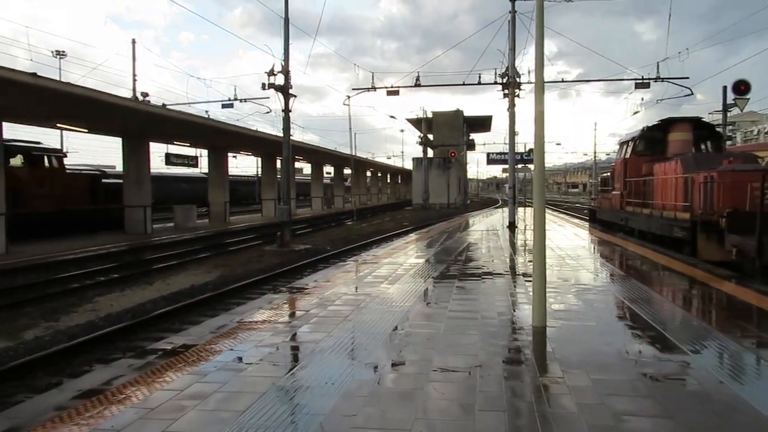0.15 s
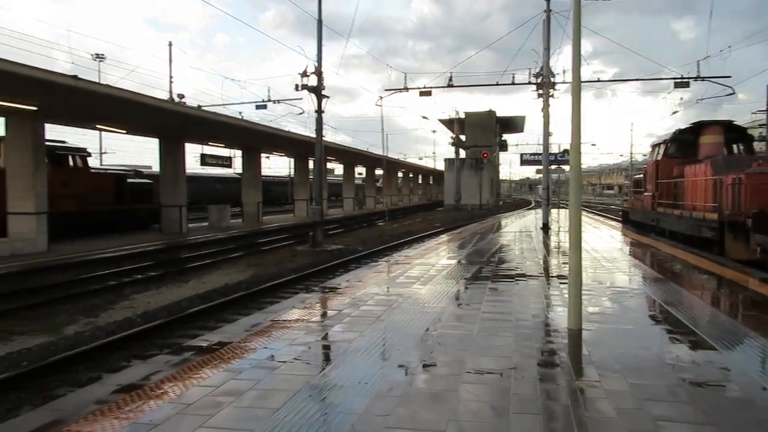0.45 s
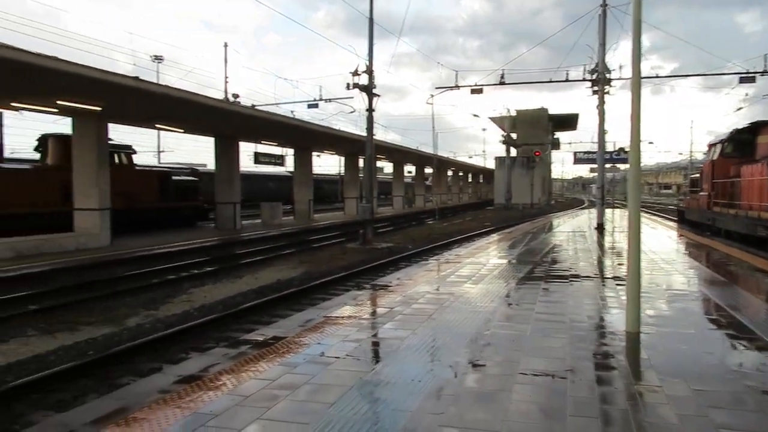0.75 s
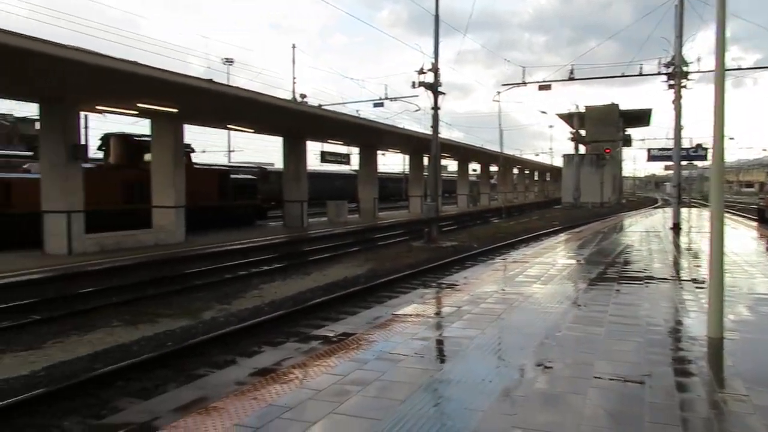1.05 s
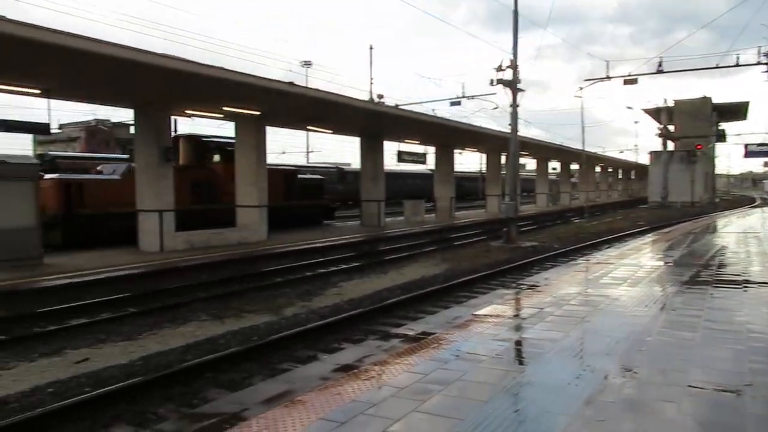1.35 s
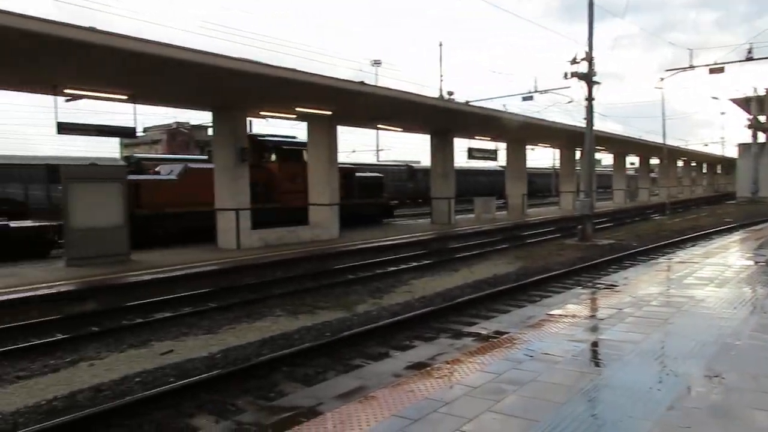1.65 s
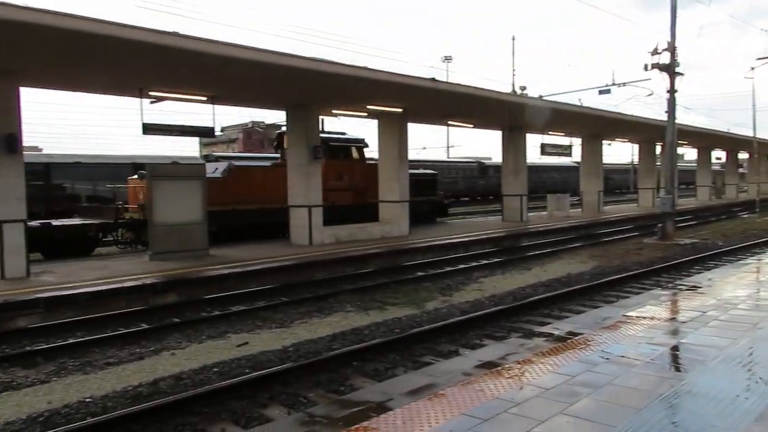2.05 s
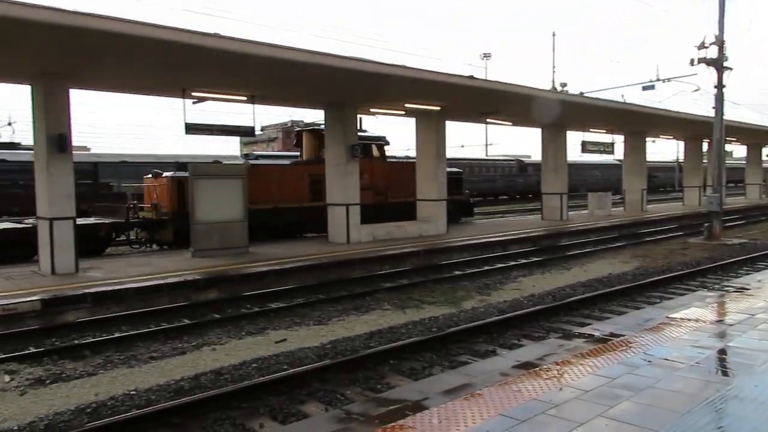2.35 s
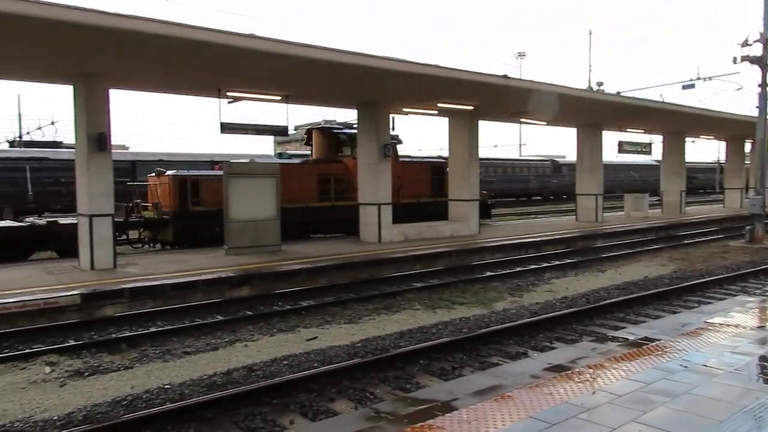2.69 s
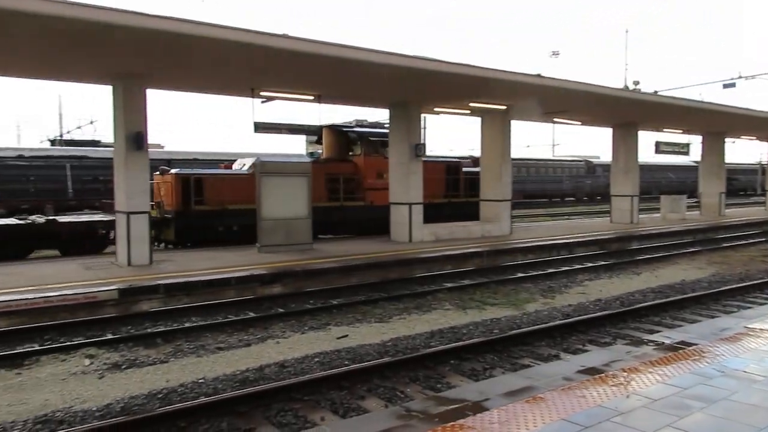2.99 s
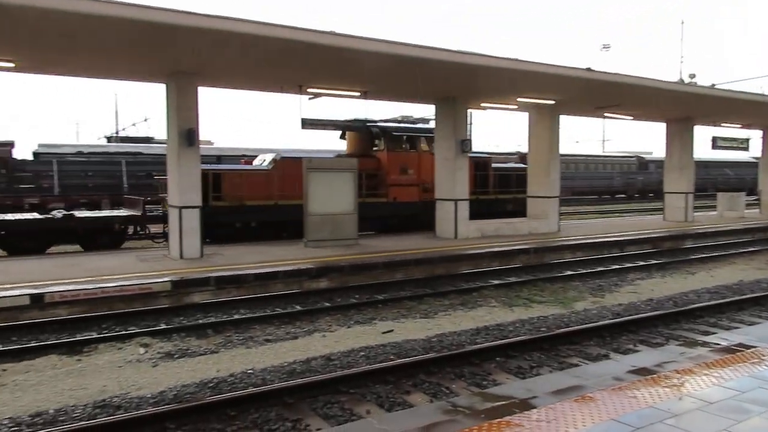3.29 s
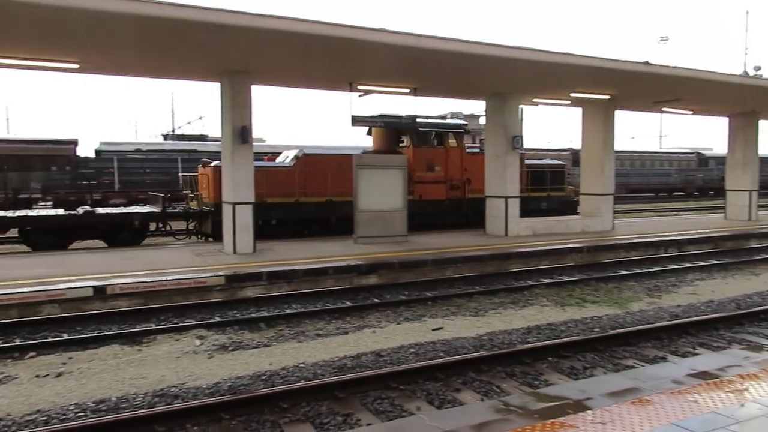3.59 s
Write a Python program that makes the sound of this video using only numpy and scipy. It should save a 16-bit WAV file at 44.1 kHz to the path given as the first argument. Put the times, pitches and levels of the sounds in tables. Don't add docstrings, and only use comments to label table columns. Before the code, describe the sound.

A diesel locomotive idles with a deep throb and rough clatter at an open station. Clinks, thumps and faint squeaks come first, then a sharp air release and long hiss, heard by close-spaced stereo microphones across the tracks.

```python
import sys
import numpy as np
from scipy import signal
from scipy.fft import rfft, irfft, next_fast_len
from scipy.io import wavfile
from scipy.ndimage import map_coordinates

SR = 44100
rng = np.random.default_rng(int(sys.argv[2]) if len(sys.argv) > 2 else 0)


def ratio(d):
    e = np.asarray(d, float) / 20
    return 10 ** e


def int16_out(signal):
    q = np.round(np.clip(np.atleast_2d(signal).T, -1, 1) * 32767)
    wavfile.write(sys.argv[1], SR, q.astype(np.int16))


N = 164493
T = np.arange(N) / SR

# start [s], peak level [dB], pitch [Hz].
JOINTS = [(0.3451, -12, 319), (.417, -15.5, 186), (0.638, -16, 226), (.771, -13, 230), (.915, -14, 268),
          (1.354, -17, 165), (1.696, -18, 178), (2.164, -17, 233), (2.27, -14, 255), (2.38, -15, 240),
          (1.78, -16, 200), (2.7633, -10, 260), (2.62, -15, 150), (1.47, -15, 172), (3.535, -18, 226)]
JOINT_T60_S = 0.16
# start [s], peak level [dB].
CLINKS = [
    (0.1016, -21.5),
    (0.2408, -21.5),
    (0.7122, -34),
    (1.04, -28),
    (2.2751, -34),
]
CLINK_RING_DB = [-20, -6.5, -20, -20, -20]
CLINK_TICK_DB = 3
# pitch [Hz], level [dB], time to fall 60 dB [s].
STEEL_MODES = [(5050, 0, .07), (5776, -2, .17), (6627, -18, .16), (7644, -14, .14)]
# start [s], length [s], pitch [Hz], level [dB].
SQUEAKS = [
    (0.0, 0.16, 5260, -36),
    (0.13, 0.08, 5240, -36),
    (0.33, 0.06, 5250, -37),
    (.42, .07, 5270, -40),
    (0.735, .125, 5230, -34),
    (1.235, 0.043, 5280, -35),
    (1.382, .04, 5300, -36),
    (1.238, .03, 5800, -39),
]
SQUEAK_RISE_HZ_PER_S, SQUEAK_WOBBLE_HZ, SQUEAK_FLUTTER_DB = 450, 30, 3.5

VALVE_OPENS_S, VALVE_RISE_S = 1.06, 0.022
# frequency [Hz], level [dB per Hz].
BLAST = [(1500, -4), (3000, -2), (6000, 4), (10000, -10), (13500, -6), (15800, -12)]
BLAST_DB, BLAST_HOLD_S, BLAST_FALL_S = -36.5, 0.085, 0.02
SPIT_BAND_HZ = [12800, 15100]
SPIT_DB, SPIT_S = -50.5, 0.3
# start [s], length [s], pitch [Hz], level [dB].
WHISTLES = [
    (1.33, .08, 6200, -41),
    (1.5, .1, 6230, -41),
    (1.68, .09, 6230, -41),
    (1.48, .14, 7300, -42),
    (1.12, .06, 6550, -42),
]
WHISTLE_WIDTH_HZ = 65
# time [s], level [dB].
AIR = [(1.06, -38), (1.2, -41), (1.4, -38), (1.75, -40.5), (2.0, -36.5), (2.22, -39.5), (2.33, -39),
       (2.5, -41.5), (2.56, -40.5), (2.85, -44.5), (3.05, -47.5), (3.25, -49), (3.5, -46.5), (3.73, -53)]
# frequency [Hz], level [dB per Hz].
JET = [(2000, -24), (3000, -7), (4200, -10.5), (6200, -4), (8500, -6.5), (11000, -12.5), (13000, -21.5),
       (15800, -34)]
JET_DB = 5
# time [s], lag [ms].
BOUNCE_LAG = [(0, 2.15), (1.0, 2.12), (1.2, 1.8), (1.9, 1.57), (2.8, 1.55), (3.73, 1.36)]
BOUNCE_DB = -13

# time [s], level [dB].
OPENNESS = [(0, -26.5), (.22, -26), (.29, -29.5), (.45, -27), (.8, -28), (1.0, -28), (1.25, -28.5),
            (1.42, -26), (1.65, -27.5), (1.85, -26), (2.05, -25.5), (2.2, -27.5), (2.45, -27), (2.75, -26),
            (2.95, -28.5), (3.32, -29.5), (3.53, -27.5), (3.73, -29)]
RUMBLE_FOLLOWS, CLATTER_FOLLOWS = 0.82, 1
# start [s], length [s], level [dB].
SURGES = [
    (1.08, .1, 2),
    (2.13, .06, 1.5),
    (2.25, .16, 3.5),
    (2.49, .11, 2.5),
    (2.58, .34, 1.6),
]
# frequency [Hz], level [dB per Hz].
RUMBLE = [(20, -34), (40, -18), (60, -13), (110, -11), (250, -10), (320, -12), (550, -18), (1000, -30),
          (1400, -50)]
RUMBLE_DB = -23
# frequency [Hz], level [dB per Hz].
CLATTER = [(500, 1), (850, -2), (1800, -7.5), (3200, -12), (5300, -16.5), (8100, -22.5), (11500, -42),
           (15800, -48)]
CLATTER_DB = -28
# pitch [Hz], width [Hz], level [dB].
PANELS = [(1100, 103, 2), (1454, 60, -4.5), (3047, 45, -7)]
PANEL_DB, PANEL_SWELL_DB = -43, 0.6
# pitch [Hz], level [dB].
WHINES = [(1087, -45), (1443, -43.5), (1478, -49), (397, -41)]
WHINE_WIDTH_HZ = 21
CYCLE_HZ = 9.5
KNOCK_DEPTH, KNOCK_SPREAD_DB, KNOCK_S, KNOCK_JITTER = 0.23, 3.5, 0.011, 0.34
# multiple of the engine cycle [1], level [dB].
EXHAUST = [(1, -23), (2, -42), (3, -23), (4, -31), (5, -14.5), (6, -1), (7, -14.5), (8, -13), (9, -5),
           (10, -19), (11, -12.5), (12, -15.5), (13, -16.5), (14, -32), (15, -15), (16, -25), (17, -19),
           (18, -17.5), (19, -19), (20, -20.5), (21, -22), (22, -17.5), (23, -19.5), (24, -19), (25, -20.5),
           (26, -22), (27, -21), (28, -21.5), (29, -22), (30, -22.5)]
EXHAUST_DB = -14.5
WANDER_DB, WANDER_MOST_DB = 0.2, 3
# time [s], extra path [m], strength [dB].
ECHO_PATH = [(0, 2.6, -14), (0.9, 4.2, -10), (1.25, 5.2, -5), (1.8, 5.4, -4.5), (2.08, 6.02, -3),
             (2.5, 7.2, 0), (3.2, 8.0, -1), (3.73, 8.9, -1)]
ECHO_LOSS_DB_PER_ORDER = 0.55

# frequency [Hz], share [0-1].
DIRECT = [(60, 0.77), (1000, 0.36), (4000, .3), (8000, .75), (14000, 0.8)]
# frequency [Hz], level [dB].
PORTS_BASS = [(30, -43), (60, -38), (130, -27), (290, -19)]
PORTS_ENGINE = PORTS_BASS + [(640, -19.0), (1410, -11.5), (3100, -9.5), (6800, -8.5), (10000, 5.5),
                (15000, 17)]
PORTS_AIR = PORTS_BASS + [(1410, -14), (3100, -10), (6800, -3), (9500, 3), (12000, 15.0), (15000, 22)]
RIGHT_LEAN, LEAN_HZ = 0.093, 300


def rms_one(x):
    return x / np.sqrt(np.mean(x ** 2) + 1e-20)


def in_time(rows):
    return np.interp(T, *np.transpose(rows))


def at_hz(points, hz):
    known_hz, values = np.transpose(points)
    return np.interp(np.log(hz), np.log(known_hz), values)


def arch(s, length):
    return np.sin(np.pi * np.clip((T - s) / length, 0, 1))


def drift(rate):
    r = np.exp(-80 * np.pi * rate / SR)
    slow = signal.lfilter([1], [1, -2 * r, r * r], rng.standard_normal(N // 40 + 2002))[2000:]
    return np.interp(np.arange(N) / 40, np.arange(len(slow)), rms_one(slow - slow.mean()))


def ring(x, hz, t60):
    r = ratio(-60 / (t60 * SR))
    w = 2 * np.pi * hz / SR
    return signal.lfilter([0, np.sin(w)], [1, -2 * r * np.cos(w), r * r], x + 1e-18)


def narrow(hz, width_hz):
    t60 = np.log(1000) / np.pi / width_hz
    once = ring(rng.standard_normal(N), hz, t60)
    return rms_one(ring(once, hz, t60))


def coloured(spectrum, shared_db, own_db, rate):
    size = next_fast_len(N)
    hz = np.arange(1, size // 2 + 2) * SR / size
    shaped = rfft(rng.standard_normal((2, size))) * ratio(at_hz(spectrum, hz))
    first, last = np.log2(spectrum[0][0]), np.log2(spectrum[-1][0])
    out, together = 0, drift(rate)
    for octave in np.arange(np.round(first), np.round(last) + 0.6, 0.5):
        band = np.clip(1 - 2 * np.abs(np.log2(hz) - octave), 0, 1)
        flicker = ratio(shared_db * together + own_db * drift(2 * rate))
        out = out + flicker * irfft(shaped * band, size)[:, :N]
    return rms_one(out)


def bounce(x):
    at = np.arange(N) - in_time(BOUNCE_LAG) * SR / 1000
    return x + ratio(BOUNCE_DB) * np.array([map_coordinates(row, [at], order=3) for row in x])


def ports(pair, side_db):
    size = next_fast_len(N)
    hz = np.arange(1, size // 2 + 2) * SR / size
    direct, diffuse = rfft(pair, size)
    share = np.clip(at_hz(DIRECT, hz), 0, 1)
    side = ratio(at_hz(side_db, hz)) * (-1j * share * direct + np.sqrt(1 - share ** 2) * diffuse)
    lean = RIGHT_LEAN * hz / (hz + LEAN_HZ) * direct
    side = irfft(side - lean, size)[:N]
    return np.array([pair[0] + side, pair[0] - side])


def rail_joints():
    out = np.zeros(N)
    for s, db, hz in JOINTS:
        click = np.zeros(SR // 2)
        click[0] = ratio(db)
        start = int(s * SR)
        out[start:][:len(click)] += ring(click, hz, JOINT_T60_S)[:N - start]
    return signal.sosfilt(signal.butter(2, [110, 600], "band", fs=SR, output="sos"), out)


def flange_squeaks():
    out = np.zeros(N)
    wobble = np.cumsum(SQUEAK_WOBBLE_HZ * drift(59.0)) / SR
    flutter_db = SQUEAK_FLUTTER_DB * (drift(40.0) - 1)
    for s, length, hz, db in SQUEAKS:
        since = np.clip(T - s, 0, length)
        turns = hz * T + SQUEAK_RISE_HZ_PER_S * since ** 2 / 2 + wobble
        out += ratio(db + flutter_db) * np.sin(np.pi * since / length) * np.sin(2 * np.pi * turns)
    return out


def coupling_clinks():
    ticks, strikes = np.zeros((2, N))
    for (s, db), ring_db in zip(CLINKS, CLINK_RING_DB):
        start = int(s * SR)
        burst = rng.standard_normal(400) * np.exp(-np.arange(400) / (0.0065 * SR))
        ticks[start:][:len(burst)] = ratio(db + CLINK_TICK_DB) * burst
        strikes[start] = ratio(db + ring_db)
    ticks = signal.sosfilt(signal.butter(2, [2000, 5000], "band", fs=SR, output="sos"), ticks)
    return ticks + sum(ratio(db) * ring(strikes, hz, t60) for hz, db, t60 in STEEL_MODES)


def seat_whistles():
    return sum(ratio(db) * arch(s, length) * narrow(hz, WHISTLE_WIDTH_HZ) for s, length, hz, db in WHISTLES)


def valve_blast():
    since = np.maximum(T - VALVE_OPENS_S, 0)
    opening = np.clip(since / VALVE_RISE_S, 0, 1)
    noise = opening * coloured(BLAST, shared_db=0.5, own_db=1.0, rate=9.0)
    spit = rms_one(signal.sosfilt(signal.butter(4, SPIT_BAND_HZ, "band", fs=SR, output="sos"), noise))
    held = np.exp(-np.maximum(since - BLAST_HOLD_S, 0) / BLAST_FALL_S)
    return ratio(BLAST_DB) * held * noise + ratio(SPIT_DB) * (since < SPIT_S) * spit


def brake_air():
    opening = np.clip((T - VALVE_OPENS_S) / VALVE_RISE_S, 0, 1)
    return opening * ratio(JET_DB + in_time(AIR)) * coloured(JET, shared_db=0.5, own_db=1.55, rate=12.0)


def gear_whines():
    return sum(ratio(db) * narrow(hz, WHINE_WIDTH_HZ) for hz, db in WHINES)


def hood_panels():
    return sum(ratio(PANEL_DB + db + PANEL_SWELL_DB * drift(2.4)) * narrow(hz, width)
               for hz, width, db in PANELS)


def firing_knocks():
    clicks = np.zeros(N + SR)
    count = int(N / SR * CYCLE_HZ * 6)
    luck = rng.standard_normal((count, 2))
    at = np.abs(np.arange(count) + KNOCK_JITTER * luck[:, 0]) / (6 * CYCLE_HZ)
    clicks[(at * SR).astype(int)] = ratio(KNOCK_SPREAD_DB * luck[:, 1])
    gate = signal.lfilter([1], [1, -np.exp(-1 / (KNOCK_S * SR))], clicks[:N])
    return 1 + KNOCK_DEPTH * rms_one(gate)


def exhaust():
    s, metres, strength_db = np.transpose(ECHO_PATH)
    late = T - np.interp(T, s, metres) / 343
    echo_db = np.interp(T, s, strength_db)
    out = 0
    for (order, db), start in zip(EXHAUST, rng.uniform(0, 2 * np.pi, len(EXHAUST))):
        w = 2 * np.pi * order * CYCLE_HZ
        echo = ratio(echo_db - ECHO_LOSS_DB_PER_ORDER * np.abs(order - 6))
        wander_db = min(WANDER_DB * order, WANDER_MOST_DB) * drift(2.76)
        out = out + ratio(db + wander_db) * (np.sin(w * T + start) - echo * np.sin(w * late + start))
    return ratio(EXHAUST_DB) * out


def engine():
    open_db = in_time(OPENNESS) - in_time(OPENNESS).mean()
    surge_db = sum(db * arch(s, length) for s, length, db in SURGES)
    beat = firing_knocks()
    rumble = ratio(RUMBLE_DB) * coloured(RUMBLE, shared_db=0.03, own_db=1.0, rate=5.1)
    rumble = ratio(RUMBLE_FOLLOWS * open_db + surge_db / 2) * rumble
    clatter = ratio(CLATTER_DB) * rms_one(beat * coloured(CLATTER, shared_db=0.3, own_db=0.8, rate=5.0))
    shaken = bounce(clatter) + rms_one(beat) * hood_panels()
    shaken = ratio(CLATTER_FOLLOWS * open_db + surge_db) * shaken
    return rumble + shaken + gear_whines() + exhaust()


def scene():
    metal = rail_joints() + flange_squeaks() + coupling_clinks()
    blast = ports(bounce(valve_blast()), PORTS_BASS)
    air = ports(bounce(brake_air()) + seat_whistles(), PORTS_AIR)
    return blast + air + ports(engine() + metal, PORTS_ENGINE)


def top_cut(x):
    return signal.sosfilt(signal.butter(12, 15720, fs=SR, output="sos"), x)


def record(dry):
    mix = 1.062 * np.tanh(dry / 1.12)
    return top_cut(mix)


dry = scene()
out = record(dry)
int16_out(out)
```